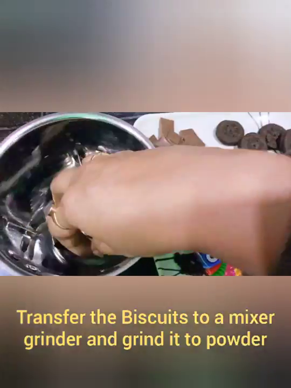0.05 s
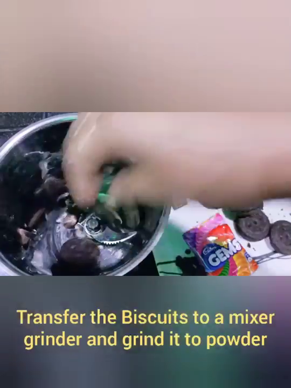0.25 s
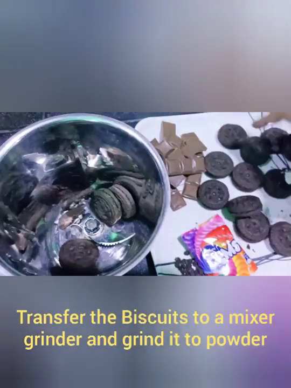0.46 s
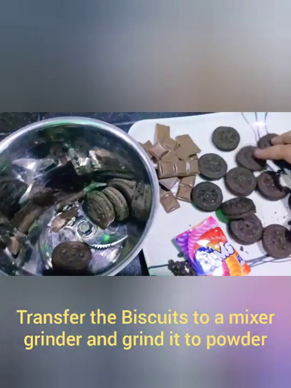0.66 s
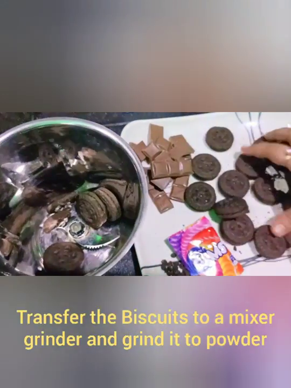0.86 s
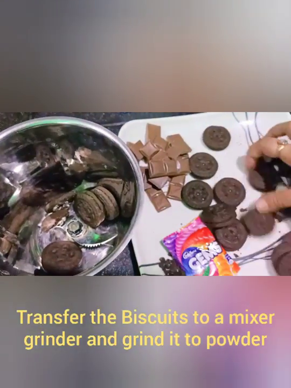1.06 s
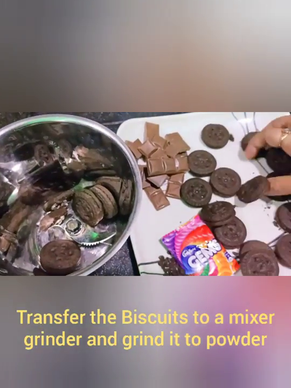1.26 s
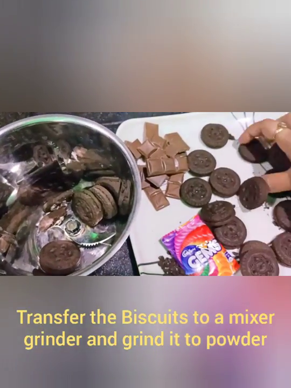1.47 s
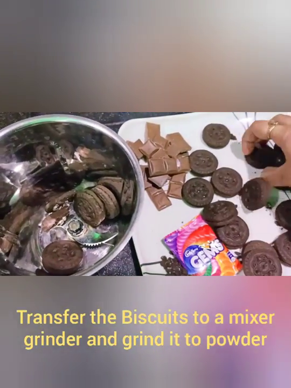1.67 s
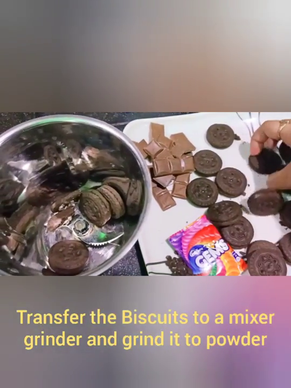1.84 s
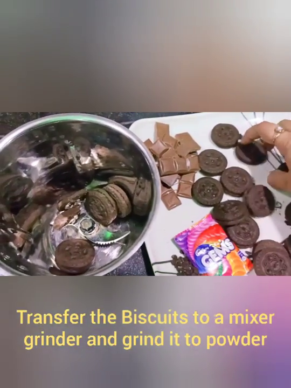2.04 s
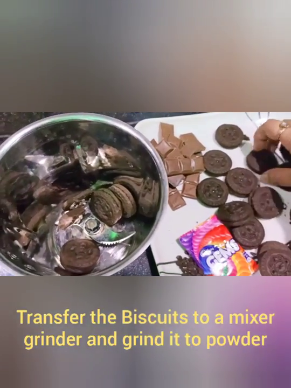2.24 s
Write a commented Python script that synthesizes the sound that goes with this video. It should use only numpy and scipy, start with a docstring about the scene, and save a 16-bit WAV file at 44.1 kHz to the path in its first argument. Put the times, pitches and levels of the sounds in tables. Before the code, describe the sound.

A quick cluster of biscuits hits a steel jar, ticking and thumping as the metal rings on; afterwards biscuits slide, tap and chatter irregularly on a plate, heard close up in a quiet small kitchen.

```python
"""Biscuits into a steel jar

Sandwich biscuits drop from a hand into a steel mixer jar: they tick, thud and tumble, and the jar rings on.
Then the fingers gather more from a plate, where the biscuits slide, scuff, knock and once graze rims.
Contacts are bursts of spiky noise; jar, base and plate are decaying sines; the rub is filtered grains.
A small kitchen with faint mains hum, heard from close by, almost in mono."""
import sys
import numpy as np
from scipy import signal
from scipy.fft import rfft, irfft, next_fast_len
from scipy.io import wavfile
from scipy.ndimage import map_coordinates

SR = 44100
rng = np.random.default_rng(int(sys.argv[2]) if len(sys.argv) > 2 else 0)


def dump(signal):
    """Clip the signal to [-1, 1] and save it as 16-bit WAV at the path in sys.argv[1]."""
    limited = np.clip(np.atleast_2d(signal).T, -1, 1)
    pcm = np.round(limited * 32767).astype(np.int16)
    wavfile.write(sys.argv[1], SR, pcm)


N = 101694
TOP_HZ = 15950  # band limit

# Biscuits landing in the jar
# [t/s, click level/dB, contact length/s, thud level/dB, wall ring level/dB, pitch of the struck spot f/Hz]
LANDINGS = [(0.0449, -31.5, 0.0025, -18.5, -76, 5560), (.087, -50.5, 0.0036, -32, -81, 2270),
            (0.1149, -56, 0.0059, -22, -74, 3700), (0.1728, -43.5, .015, -26, -55.5, 5500),
            (0.196, -33.5, 0.019, -30.5, -62, 5550), (0.21, -34, 0.016, -33.5, -38.5, 2540),
            (0.2149, -31.5, 0.0085, -31, -57, 2370), (0.2232, -33.5, 0.014, -43, -46, 3020),
            (.231, -30.5, 0.015, -40, -61, 3800), (0.258, -39.5, 0.025, -36, -43, 2920),
            (0.2714, -47, 0.003, -27, -60, 2410), (0.2832, -34, 0.0039, -19.5, -65, 5760),
            (0.298, -31, 0.028, -42, -53, 5850), (0.304, -38, 0.0089, -56, -58, 6200),
            (0.336, -50, .01, -25.5, -65, 1180), (0.373, -44.5, 0.017, -32, -54, 3640)]


def amp(db):
    """Decibels to gain."""
    return 10 ** (np.asarray(db) / 20)


def unit(x):
    """Scale to rms 1."""
    return x / np.sqrt(np.mean(x ** 2) + 1e-20)


def along(points, hz):
    """(Hz, value) points read on a log frequency axis."""
    f, v = np.transpose(points)
    return np.interp(np.log(hz + 1), np.log(f + 1), v)


def add(track, s, x):
    """Mix x into the track from time s."""
    i = round(s * SR)
    track[i:i + len(x)] += x[:max(N - i, 0)]


def butter(x, order, hz, kind):
    """Butterworth filter."""
    return signal.sosfilt(signal.butter(order, hz, kind, fs=SR, output='sos'), x)


def low_cut(x, hz, order=3):
    """High-pass: small, light objects radiate little bass."""
    return butter(x, order, hz, 'high')


def coloured(x, points):
    """Causal minimum-phase filter of unit energy with the given colour."""
    size = 2048
    cepstrum = irfft(np.log(amp(along(points, np.fft.rfftfreq(size, 1 / SR)))))
    # fold the cepstrum forward in time
    cepstrum[1:size // 2] *= 2
    cepstrum[size // 2:] = 0
    h = irfft(np.exp(rfft(cepstrum)))
    return signal.fftconvolve(x, h / np.linalg.norm(h))[:N]


def ring(modes, length_s, scatter=0):
    """Decaying sines; scatter 1 starts them at random phases."""
    t = np.arange(int(length_s * SR)) / SR
    out = np.zeros(len(t))
    for hz, db, t60 in modes:
        cycles = hz * t + scatter * rng.random()
        out += amp(db - 60 * t / t60) * np.sin(2 * np.pi * cycles)
    return out


def crumbs(count, spiky):
    """A stream of tiny fractures, a few much larger than the rest."""
    size = np.exp(spiky * np.clip(rng.standard_normal(count), -2, 2))
    return rng.standard_normal(count) * size


def contact(length_s, spiky, rise_share):
    """A burst of crumbs that builds up, then falls 20 dB per length, with the energy of 10 ms at rms 1."""
    t = np.arange(SR // 8) / SR
    rise = np.clip(t / (rise_share * length_s), 0, 1) ** 2
    x = crumbs(len(t), spiky) * amp(-20 * t / length_s) * rise
    return x / np.linalg.norm(x) * np.sqrt(SR / 100)


def jar():
    """Each landing clicks on the steel, thumps the base and leaves a shimmer; each spot has its own pitch."""
    # Colour of the clicks [f/Hz, relative level/dB]
    click_colour = [(150, -22), (550, 5), (900, -0.5), (1250, 4), (2100, -2.5), (3000, -2.5), (4100, -1.5),
                    (4900, -4), (5800, -1.5), (7500, -13), (10500, -14.5), (13500, -6), (16000, -8)]
    # Modes of the jar's base [f/Hz, relative level/dB, t60/s]
    base_modes = [(123, -13.5, 0.14), (378, -18.5, 0.018), (500, -15, 0.015), (619, -6.5, 0.019)]
    spot_db, spot_octaves = 13.5, 0.16  # how far the struck spot's pitch stands out, and its width
    base_spread = .09  # relative shift of the base's pitches with the place of the blow
    shimmer_db, shimmer_t60_s = -24, 0.13  # the crowd of weaker wall modes

    clicks, thuds = np.zeros((2, N))
    grid = np.geomspace(click_colour[0][0], TOP_HZ)
    for s, click_db, length_s, thud_db, _, spot_hz in LANDINGS:
        spot = spot_db * np.exp(-.5 * (np.log2(grid / spot_hz) / spot_octaves) ** 2)
        colour = np.column_stack([grid, along(click_colour, grid) + spot])
        burst = contact(length_s, spiky=0.86, rise_share=0.087)
        add(clicks, s, amp(click_db) * coloured(burst, colour))
        struck = [(hz * (1 + base_spread * rng.normal()), db, t60) for hz, db, t60 in base_modes]
        add(thuds, s, amp(thud_db) * ring(struck, .1))

    crowd_hz = np.linspace(1100, 15500, num=130) + rng.uniform(-55, 55, size=130)
    crowd = ring([(hz, 0, shimmer_t60_s) for hz in crowd_hz], .5, scatter=1)
    shimmer = signal.fftconvolve(clicks, crowd / np.linalg.norm(crowd))[:N]
    return clicks + low_cut(thuds, hz=260) + amp(shimmer_db) * shimmer


def wall():
    """Every landing feeds the modes of the steel wall unevenly, and each mode fades at its own speed."""
    # Modes of the jar's steel wall [f/Hz, relative level/dB, t60/s]
    steel_modes = [(1082, -2.5, .9), (1148, -12, .55), (1420, -11, .45), (1701, -16, .9), (2038, -2, .46),
                   (2402, 0, .32), (2438, -2, .33), (2689, -5, .35), (2852, -2, .95), (2975, 0, .3),
                   (3340, -3, .3), (3458, -6, .8), (3700, -3, .32), (4113, -10, .45), (4270, -3, .42),
                   (4576, -12, .6), (5373, -8, .35), (5648, -2, .3), (5915, -4, .27), (6660, -12, .4)]
    t = np.arange(N) / SR
    out = np.zeros(N)
    for hz, db, t60 in steel_modes:
        feed = np.zeros(N)  # energy fed in, spread over each contact
        for s, _, length_s, _, ring_db, _ in LANDINGS:
            count = int(length_s * SR) + 1
            energy_in = amp(ring_db + rng.normal(0, 2)) ** 2
            add(feed, s, np.full(count, energy_in / count))
        kept_per_sample = amp(-60 / (t60 * SR)) ** 2
        energy = signal.lfilter([1], [1, -kept_per_sample], feed)
        out += amp(db) * np.sqrt(energy) * np.sin(2 * np.pi * (hz * t + rng.random()))
    return out


def plate():
    """Dull, short knocks that chatter, with a crumbly scuff; the plate rings a little."""
    # Biscuits knocking on the plate and on each other
    # [t/s, knock level/dB, knock pitch f/Hz, scuff level/dB, contact length/s]
    taps = [(0.581, -31.5, 1500, -46, 0.019), (0.62, -24.5, 1120, -43, 0.01),
            (0.666, -24.5, 920, -45.5, 0.021), (0.6902, -12.5, 1480, -32.5, 0.003),
            (0.762, -33, 1090, -48, 0.0077), (.811, -31, 1350, -71, 0.0046),
            (0.874, -25, 1490, -46.5, 0.015), (0.945, -12, 1544, -37, 0.011),
            (0.953, -12.5, 1500, -49, 0.0098), (1.077, -23.5, 1350, -42, 0.014),
            (1.088, -24, 1120, -34.5, 0.026), (1.131, -24, 1110, -40.5, 0.029),
            (1.181, -26.5, 1170, -65, 0.015), (1.237, -17.5, 1696, -40.5, 0.011),
            (1.261, -24, 747, -39.5, 0.022), (1.313, -57, 1420, -39, 0.012),
            (1.415, -39, 1780, -38, 0.0061), (1.477, -41, 1620, -42, 0.038),
            (1.551, -36, 1540, -48.5, 0.0061), (1.616, -36, 1520, -63, 0.011),
            (1.664, -42, 950, -39.5, 0.046), (1.803, -24.5, 886, -44.5, 0.016),
            (1.875, -42, 1440, -43, 0.034), (1.893, -63, 3420, -40, 0.0059),
            (2.019, -27.5, 1310, -41.5, 0.011), (2.059, -5, 914, -41, 0.0059),
            (2.079, -22.5, 786, -55, 0.015), (2.1374, -22, 1095, -42, 0.0076),
            (2.239, -27.5, 1908, -39, 0.0017), (2.249, -33.5, 1650, -38.5, 0.009)]
    # Modes of a biscuit's knock [ratio to its pitch, relative level/dB, t60/s]
    knock_modes = [(.68, -14.5, 0.0023), (1.002, -6.5, 0.016), (1.42, -17.5, 0.013)]
    # Modes of the plate [f/Hz, relative level/dB, t60/s]
    plate_modes = [(755, 0, 0.12), (900, 26, 0.13), (1414, -49, 0.13)]
    # Colour of the scuffs [f/Hz, relative level/dB]
    scuff_colour = [(150, -21), (500, -12.5), (900, 7), (1800, 5), (2600, 0), (3700, 4), (4900, -4),
                    (5900, -0.5), (7200, -14), (10000, -22)]
    chatter_db = 1.5  # rattling after a knock that lasts 20 ms; it grows with the contact length
    plate_db = -29  # the plate's ring, driven by the knocks

    knocks, scuffs = np.zeros((2, N))
    for s, db, hz, scuff_db, length_s in taps:
        force = contact(length_s, spiky=1.5, rise_share=0.18)
        force = force / np.linalg.norm(force) * amp(chatter_db) * length_s / .02
        force[0] = 1  # the first blow, ahead of the chatter
        knock = ring([(hz * ratio, level, t60) for ratio, level, t60 in knock_modes], .1)
        add(knocks, s, amp(db) * low_cut(signal.fftconvolve(force, knock), hz * 0.5))
        add(scuffs, s, amp(scuff_db) * contact(length_s, spiky=1.0, rise_share=0.2))

    knocks = butter(knocks, 2, [240, 5000], 'band')
    dish = ring(plate_modes, .4)
    dish = dish / np.linalg.norm(dish)
    plate_ring = amp(plate_db) * signal.fftconvolve(knocks, dish)[:N]
    return knocks + plate_ring + coloured(scuffs, scuff_colour)


def sliding(catches_per_s=260):
    """Biscuits dragged over the plate: the low rub and the high grit catch and slip each in their own clumps."""
    # Colour of the friction [f/Hz, relative level/dB]
    friction_colour = [(200, -15.5), (450, -12), (890, 8), (1200, -5), (1600, 2.5), (2400, -6.5),
                       (3900, -5), (4700, -14.5), (5850, -6), (7300, -28)]
    # Loudness of the sliding [t/s, level/dB]
    slide_level = [(.555, -60), (.57, -50), (.72, -46.5), (.79, -57), (.93, -43), (.99, -40.5),
                   (1.05, -51.5), (1.1, -43), (1.27, -45), (1.35, -53.5), (1.7, -56), (1.75, -57.5),
                   (2.3, -52.5)]
    uneven_db = 2.5  # swing of the friction from catch to catch

    t = np.arange(N) / SR
    grains = coloured(crumbs(N, spiky=0.71), friction_colour)
    friction = np.zeros(N)
    for band in ('low', 'high'):
        catches = map_coordinates(rng.standard_normal(N // 10), [t * catches_per_s])
        friction += amp(uneven_db * catches) * butter(grains, 3, 1900, band)
    level = amp(np.interp(t, *np.transpose(slide_level)))
    return unit(friction) * level * (t > slide_level[0][0])


def graze():
    """One biscuit's rim grazes another: a brief, bright crackle that swells and fades."""
    graze_s, width_s, graze_db = 2.176, 0.015, -51.5
    swell = np.exp(-.5 * ((np.arange(N) / SR - graze_s) / width_s) ** 2)
    rim = butter(crumbs(N, spiky=0.6), 1, [5000, 6200], 'band')
    return amp(graze_db) * swell * unit(rim)


def background():
    """Room air as coloured noise, and mains hum as steady sines."""
    # Colour of the room air [f/Hz, relative level/dB]
    air_colour = [(30, -5.5), (130, -5), (300, -2.5), (800, -33), (3000, -17.5), (16000, -29.5)]
    # Mains hum [f/Hz, rms level/dB]
    hum_tones = [(60, -76.5), (120, -76)]
    air_db = -68  # rms

    t = np.arange(N) / SR
    hum = np.zeros(N)
    for hz, db in hum_tones:
        hum += amp(db) * np.sqrt(2) * np.sin(2 * np.pi * (hz * t + rng.random()))
    return hum + amp(air_db) * unit(coloured(rng.standard_normal(N), air_colour))


def kitchen(x, early_db, early_t60_s, tail_db):
    """Quick echoes from the worktop, then the short tail of the room, each pitch fading at its own speed."""
    # Decay of the room [f/Hz, t60/s]
    room_t60 = [(250, 0.42), (1500, 0.43), (5000, 0.35), (14000, 0.18)]
    hz, t, z = signal.stft(rng.standard_normal(SR // 2), SR, nperseg=256)
    fade = amp(-60 * t / along(room_t60, hz)[:, None])
    tail = signal.istft(z * fade, SR, nperseg=256)[1]
    t = np.arange(len(tail)) / SR
    tail = tail * np.clip(t / 0.0025, 0, 1)
    early = crumbs(len(t), spiky=1) * amp(-60 * t / early_t60_s) * (t > .002)
    h = amp(early_db) * early / np.linalg.norm(early) + amp(tail_db) * tail / np.linalg.norm(tail)
    return x + signal.fftconvolve(x, h)[:N]


def scene():
    """All in the centre, with a trace of width in the jar's treble."""
    steel = kitchen(jar(), early_db=-10.0, early_t60_s=0.016, tail_db=-7.5)
    dish = kitchen(plate() + sliding() + graze(), early_db=-9.0, early_t60_s=0.065, tail_db=-16)
    mid = steel + wall() + dish + background()
    late_steel = np.pad(steel, (40, 0))[:N]  # 40 samples late
    side = amp(-19) * low_cut(late_steel, hz=4200, order=8)
    return mid + np.array([side, -side])


def record(dry):
    """Nothing is kept above the band limit."""
    m = next_fast_len(N + SR // 2)
    kept = np.fft.rfftfreq(m, 1 / SR) < TOP_HZ
    return irfft(rfft(dry, m) * kept, m)[:, :N]


dry = scene()
out = record(dry)
dump(out)
```